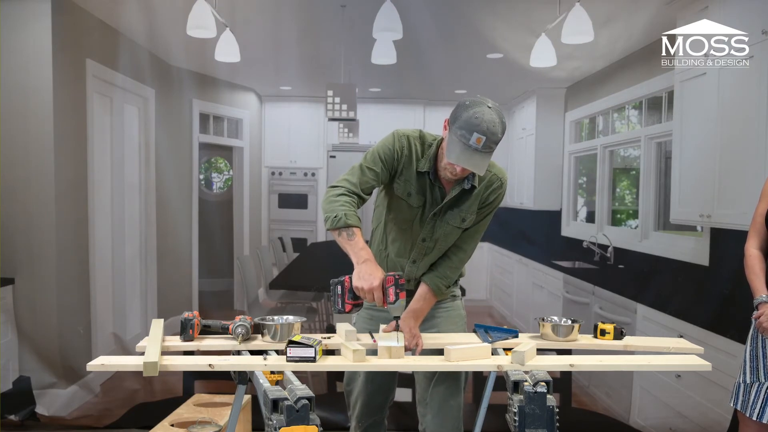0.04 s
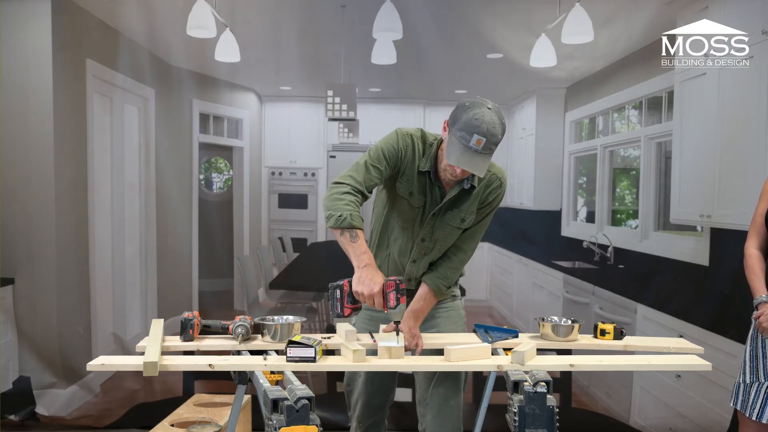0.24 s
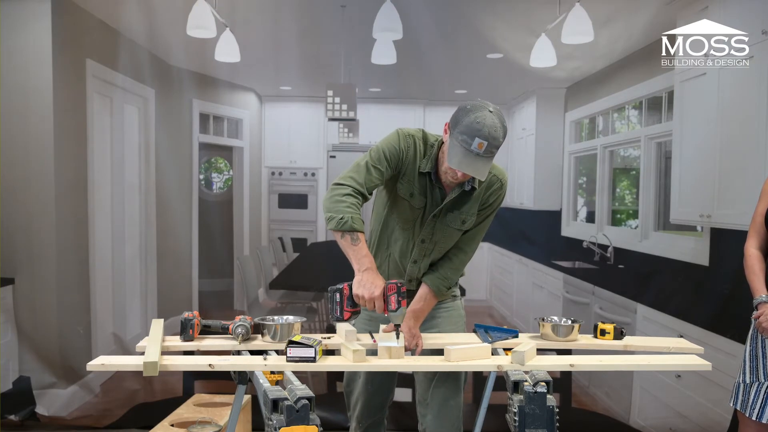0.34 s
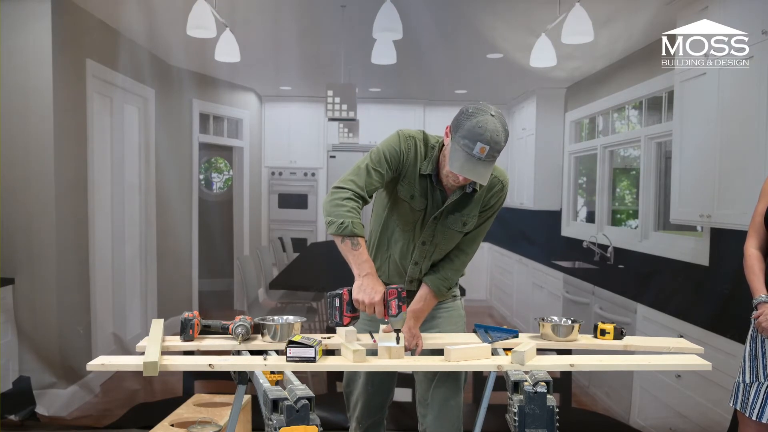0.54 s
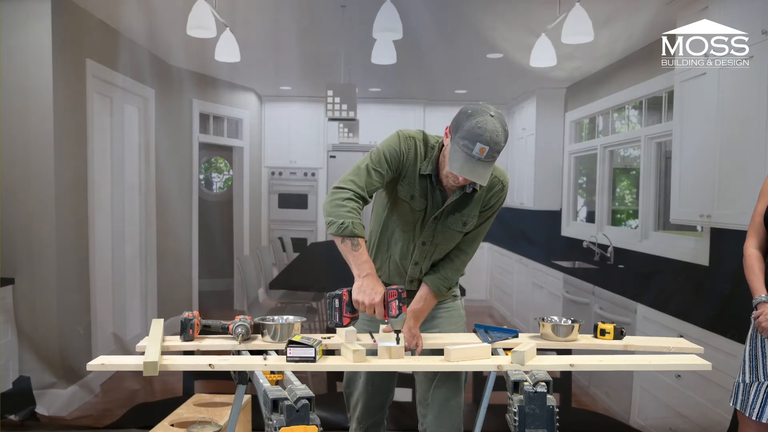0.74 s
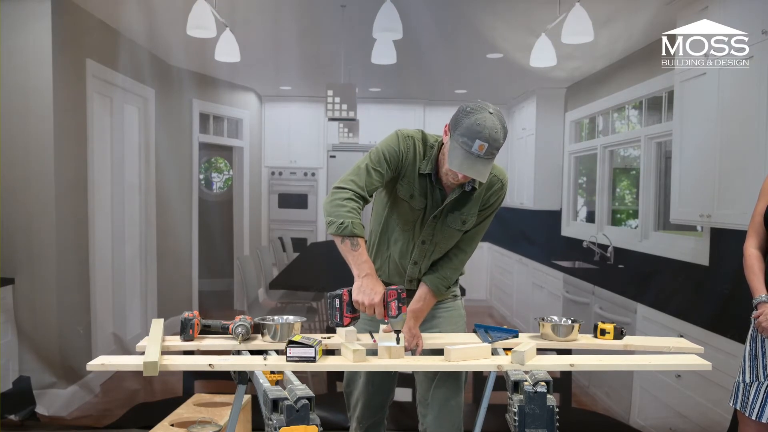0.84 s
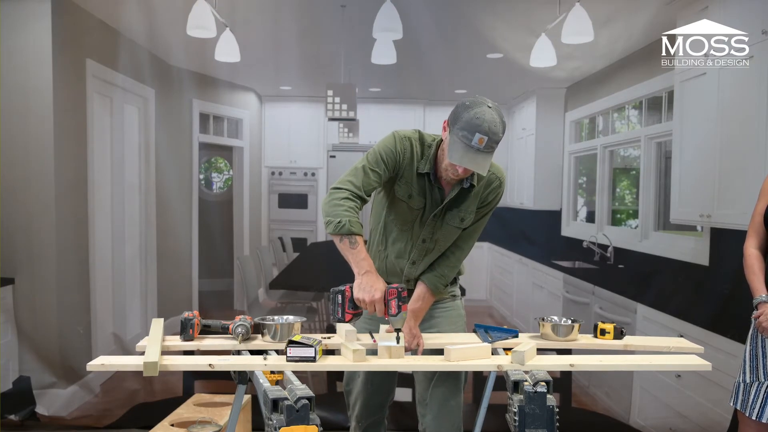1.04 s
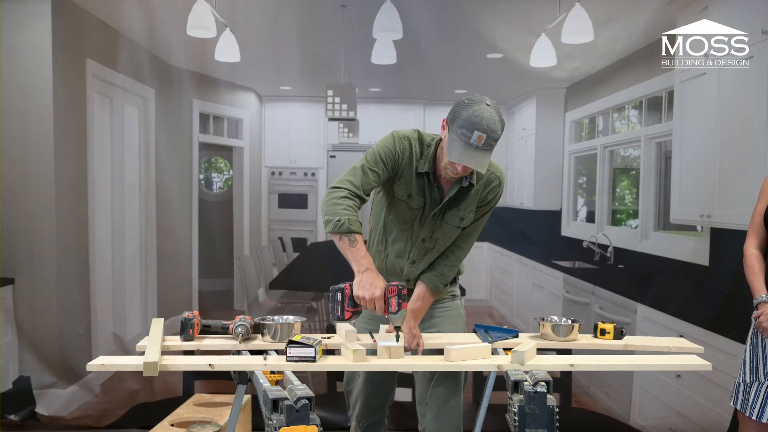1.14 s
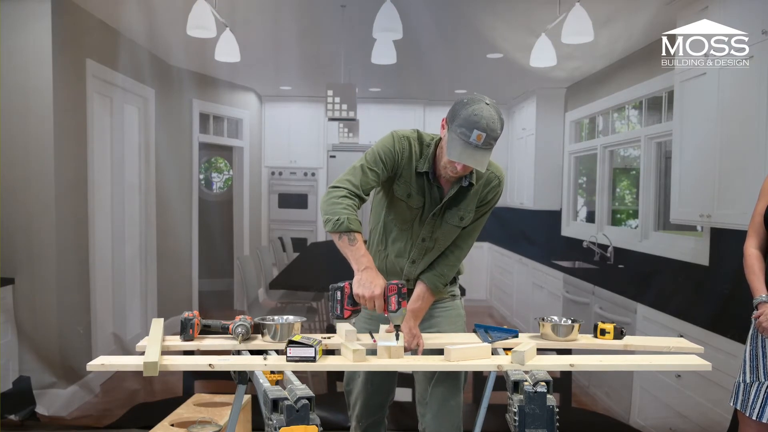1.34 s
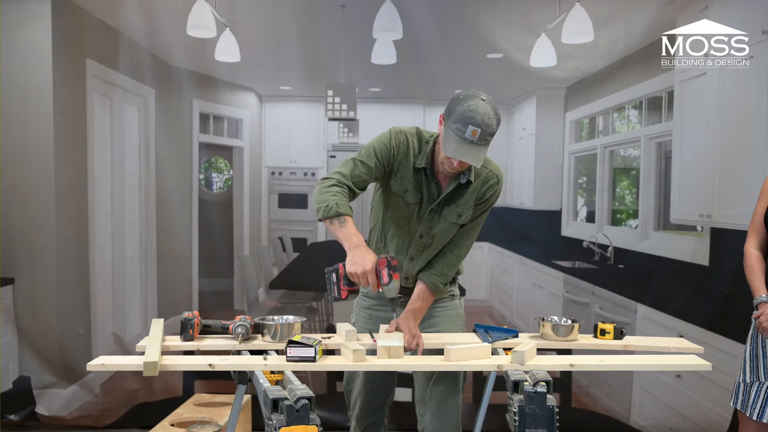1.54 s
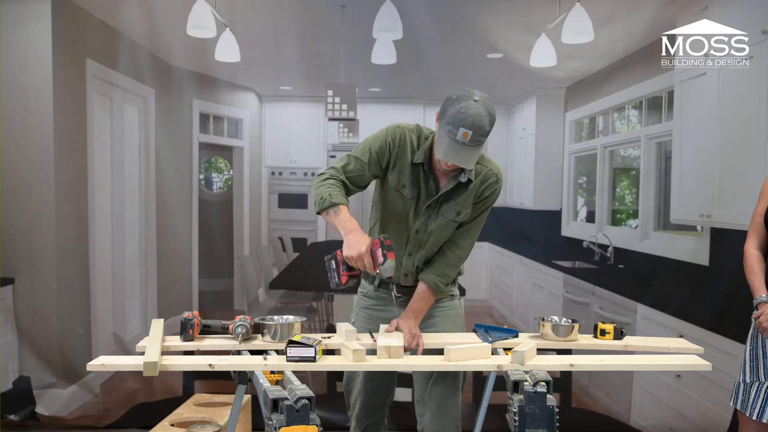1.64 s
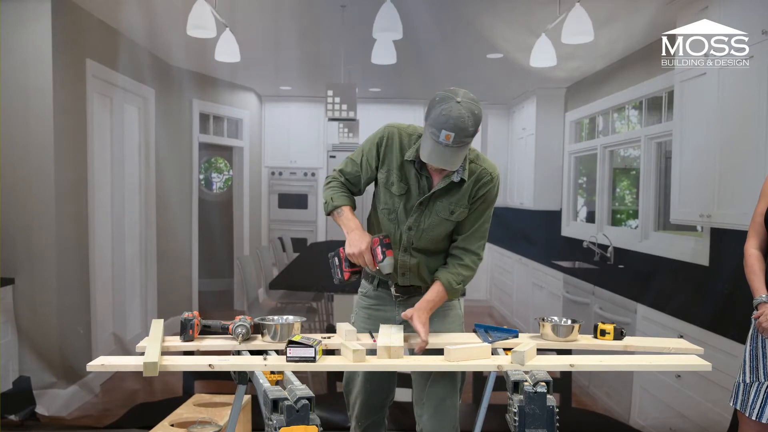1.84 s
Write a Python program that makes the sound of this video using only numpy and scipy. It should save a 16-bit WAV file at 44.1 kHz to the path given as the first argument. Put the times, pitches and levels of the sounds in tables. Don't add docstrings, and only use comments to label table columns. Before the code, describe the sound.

A cordless drill clicks on and whines up fast, sags in pitch as the bit grinds into a board, climbs again, then brakes with clicks in a hard room, heard from a couple of metres away.

```python
import sys
import numpy as np
from scipy import signal
from scipy.fft import rfft, irfft
from scipy.io import wavfile
from scipy.ndimage import uniform_filter1d

SR = 44100
rng = np.random.default_rng(int(sys.argv[2]) if len(sys.argv) > 2 else 0)


def wav_record(signal):
    frames = np.transpose(np.atleast_2d(signal))
    bounded = np.clip(frames, -1, 1)
    quanta = np.round(bounded * 32767).astype(np.int16)
    wavfile.write(sys.argv[1], SR, quanta)


def linear_from_db(decibels):
    return 10 ** (np.asarray(decibels, float) / 20)


N = 83790
TRIGGER_S, ENGAGE_S, STOP_S = .208, .24, 1.607


def level(x, db):
    return x * linear_from_db(db) / np.sqrt(np.mean(x ** 2))


def noise():
    return rng.standard_normal(N)


def colour(x, points):
    hz = np.fft.rfftfreq(N, 1 / SR) + 1
    point_hz, point_db = np.array(points).T
    gain_db = np.interp(np.log(hz), np.log(point_hz), point_db, left=-60, right=-90)
    return irfft(rfft(x) * linear_from_db(gain_db), N)


def ring(x, hz, width):
    b, a = signal.iirpeak(min(hz, .45 * SR), hz / max(width, 5), fs=SR)
    return signal.lfilter(b, a, x)


def body(x, peaks):
    return sum((-1) ** k * linear_from_db(db) * ring(x, hz, width) for k, (hz, width, db) in enumerate(peaks))


def walk(rate):
    hold = int(SR / rate)
    steps = np.repeat(rng.standard_normal(N // 20), hold)[:N]
    return 1.233 * uniform_filter1d(uniform_filter1d(steps, hold), hold)


def grit(scatter_db):
    impacts = noise()
    size_db = scatter_db * np.minimum(rng.exponential(size=N), 4)
    return impacts * linear_from_db(size_db)


def whine(hz, db):
    waver, flutter_db, flutter_hz = .0012, 2.0, 35
    phase = 2 * np.pi * np.cumsum(hz * (1 + waver * walk(59.7))) / SR
    return np.sqrt(2) * linear_from_db(db + flutter_db * walk(flutter_hz)) * np.sin(phase)


# time in seconds, first gear mesh in Hz.
SPEED = [(.208, 0), (.26, 2400), (.285, 3400), (.31, 3900), (.34, 4150), (.38, 4280), (.43, 4315),
         (.49, 4225), (.66, 3790), (.76, 3610), (.83, 3490), (.93, 3445), (1.07, 3495), (1.2, 3750),
         (1.4, 3990), (1.53, 4185), (1.555, 4180), (1.58, 3000)]


def mesh_hz(t):
    return uniform_filter1d(np.interp(t, *np.array(SPEED).T), size=600)


# time in seconds, then levels in dB of the first mesh, second mesh and loaded stage.
WHINE = [(.29, -44, -52, -45), (.33, -37, -44, -45), (.37, -41, -43, -45), (.43, -40, -38, -40),
         (.5, -36, -46, -37), (.6, -39, -47, -38), (.7, -44, -47, -36), (.78, -46, -46, -33),
         (.9, -43, -47, -30), (1.07, -43, -47, -30), (1.1, -43, -45, -37), (1.2, -40, -40, -42),
         (1.3, -38, -47, -46), (1.41, -38, -46, -48), (1.44, -36, -38, -48), (1.555, -38, -38, -48)]


def gear_gain(t, column):
    rows = np.array(WHINE)
    return linear_from_db(np.interp(t, rows[:, 0], rows[:, column]))


# multiple of the mesh, level in dB over its gear, column of that gear in WHINE.
FREE = [(1.0, 0, 1), (.972, -11, 1), (2.004, -17, 1), (.737, 0, 2), (1.472, -7, 1)]
# offset in Hz, shift in Hz per Hz of mesh, level in dB over the first mesh.
OVERTONE = (6500, 1.2, -21)


def free_gears(t, hz):
    tones = sum(whine(k * hz, db) * gear_gain(t, column) for k, db, column in FREE)
    offset_hz, shift, overtone_db = OVERTONE
    tones = tones + whine(offset_hz + shift * hz, overtone_db) * gear_gain(t, column=1)
    speed_gain = np.minimum(hz / hz.max() / .8, 1) ** 6
    ending = np.clip((1.578 - t) / .022, 0, 1)
    return tones * speed_gain * ending


# multiple of the mesh, level in dB over the loaded stage.
LOADED = [(.825, 0), (.804, -11), (1.247, -14)]
# offset in Hz, shift in Hz per Hz of mesh, dB over the loaded stage.
HIGH_TONES = [(10160, 0, -23), (11760, 0, -29), (17350, -.825, -36), (16200, -.825, -38)]
# multiple of the mesh, level in dB.
ROUGH = [(.41, -42), (.431, -43), (1.635, -47), (1.667, -49), (2.477, -52), (2.06, -58)]


def loaded_gears(t, hz):
    stage = sum(whine(k * hz, db) for k, db in LOADED)
    stage = stage + sum(whine(offset_hz + k * hz, db) for offset_hz, k, db in HIGH_TONES)
    rough = sum(whine(k * hz * (1 + .0024 * walk(90)), db) for k, db in ROUGH)
    bite_s, rise_s, bite_ends_s, fall_s = .4, .07, 1.36, .14
    bite = np.clip(np.minimum((t - bite_s) / rise_s, (bite_ends_s - t) / fall_s), 0, 1)
    return (stage * gear_gain(t, column=3) + rough) * bite


def motor_start(t):
    start_s, rise_s, pitch_hz, peak_db, t60_s = .201, .013, 7800, -52, .12
    rise = np.clip((t - start_s) / rise_s, 0, 1)
    decay = linear_from_db(peak_db - 60 * np.maximum(t - TRIGGER_S, 0) / t60_s)
    return rise * decay * np.sin(2 * np.pi * pitch_hz * t)


# time in seconds, then levels in dB of the housing rattle, bit scraping and board drone.
DRILL = [(.28, -0.5, -5.5, -3.5), (.34, 3, -0.5, -16), (.42, 1.5, 0, -2), (.5, 1.5, 1.5, 2),
         (.58, 2, 5.5, 4), (.68, 2, 4.5, -3.5), (.77, 4, 7.5, -15), (.87, 3, 0.5, -7), (.96, 3.5, 5, 2.5),
         (1.09, 2.5, 6, 2), (1.17, 2, 5.5, -4.5), (1.193, -3.5, 6, 8.5), (1.28, 2, 0, 7.5),
         (1.38, 1, 1.5, 5.5), (1.43, 2.5, -7, -10), (1.555, -2.5, -2.5, -21)]


def control(t, column):
    rows = np.array(DRILL)
    db = rows[:, column]
    spin_up_db = -15.5
    times = np.r_[TRIGGER_S, ENGAGE_S, rows[:, 0]]
    levels_db = np.r_[db[0] + spin_up_db, db[0], db]
    running = uniform_filter1d(1. * ((t > TRIGGER_S) & (t < STOP_S)), size=90)
    return linear_from_db(np.interp(t, times, levels_db)) * running


# frequency in Hz, spectral level in dB per Hz.
RATTLE = [(180, 8), (300, -22), (641, 1), (2740, 2.5), (4080, -3), (5220, -12), (6060, -9), (11700, -15),
          (15500, -38)]
# resonance in Hz, width in Hz, level in dB.
HOUSING = [(4300, 1350, 0), (5900, 1000, 9), (8870, 1500, -5.5), (12300, 1500, -15)]


def rattle(t):
    impacts = colour(grit(scatter_db=3.0), RATTLE)
    shell = level(impacts + body(impacts, HOUSING), -36.5)
    return shell * linear_from_db(1.7 * walk(110)) * control(t, column=1)


# resonance in Hz, width in Hz, level in dB.
SCRAPE = [(1175, 230, -0.5), (1552, 117, 3.5), (1940, 606, -3), (2330, 400, -4), (3000, 600, -10)]


def scrape(t):
    tearing = level(body(grit(scatter_db=3), SCRAPE), -39.5)
    return tearing * linear_from_db(.75 * walk(51.4)) * control(t, column=2)


# resonance in Hz, width in Hz, level in dB.
BOARD = [(440, 87, -5.5), (559, 78, 0), (729, 163, 2), (877, 88, -3)]


def board(t):
    radiates = signal.butter(4, 360, "high", fs=SR, output="sos")
    drone = level(signal.sosfilt(radiates, body(grit(scatter_db=3), BOARD)), -44)
    return drone * linear_from_db(2.0 * walk(30)) * control(t, column=3)


# start in seconds, peak in dB, ring in Hz, t60 in seconds.
CLICKS = [(0.152, -72, 2840, 0.09), (.211, -36, 3440, 0.016), (0.2538, -23, 3950, .012),
          (0.2593, -21, 4200, .012), (.262, -25, 4400, 0.013), (0.2644, -26, 3000, 0.0084),
          (0.2877, -24, 3210, 0.018), (1.5675, -26, 3470, 0.016), (1.571, -35, 3270, 0.019),
          (1.578, -34, 2480, 0.016), (1.5985, -28, 3230, .012), (1.6032, -27, 4300, 0.017),
          (1.604, -30, 1670, 0.018)]


def clicks(t):
    gain_db, crack_db, crack_t60_s, knock_hz, knock_db = .5, -7.5, .004, 1320, -12.5
    crack_noise = level(ring(ring(noise(), 5500, 4100), 5500, 4100), 0)
    out = np.zeros(N)
    for s, db, hz, t60 in CLICKS:
        since = np.maximum(t - s, 0)
        tone = np.sin(2 * np.pi * hz * since)
        tone = tone + linear_from_db(knock_db) * np.sin(2 * np.pi * knock_hz * since)
        tone = tone * linear_from_db(-60 * since / max(t60, .003))
        crack = linear_from_db(crack_db - 60 * since / crack_t60_s) * crack_noise
        out += (t >= s) * linear_from_db(db + gain_db) * (tone + crack)
    return out


# start in seconds, peak in dB, ring in Hz, t60 in seconds.
JOLTS = [
    (.228, -32, 793, .08),
    (0.229, -34, 440, 0.076),
    (0.249, -25, 1185, 0.064),
    (1.603, -38.5, 708, 0.076),
]


def jolts(t):
    out = np.zeros(N)
    for s, db, hz, t60 in JOLTS:
        since = np.maximum(t - s, 0)
        rise = 1 - np.exp(-since / .0022)
        out += linear_from_db(db - 60 * since / t60) * rise * np.sin(2 * np.pi * hz * since)
    return out


# frequency in Hz, reverberation time in seconds.
ROOM_T60 = [(300, 0.42), (800, 0.22), (1700, 0.34), (2500, 0.28), (3100, 0.45), (4300, 0.74), (6000, 0.41),
            (9000, 0.35), (14000, 0.4)]


def room(x, t):
    row_hz, row_t60 = np.array(ROOM_T60).T
    tail = 0
    for hz in 250 * 2 ** np.arange(0, 6.1, .5):
        t60 = np.interp(np.log(hz), np.log(row_hz), row_t60)
        tail = tail + ring(noise(), hz, hz / 3) * linear_from_db(-60 * t / t60)
    tail = tail * (t > .004)
    tail = tail * linear_from_db(-6) / np.sqrt(np.sum(tail ** 2))
    return signal.fftconvolve(x, tail)[:N]


# frequency in Hz, spectral level in dB per Hz.
FLOOR = [(20, -14), (60, -5), (100, 1.5), (200, -6), (400, -25.5), (4200, -48), (6500, -72), (9000, -95)]
# centre in Hz, width in Hz, level in dB.
HUM = [(97, 14, -57), (152, 14, -60), (5600, 30, -94), (6050, 30, -96)]


def floor():
    hum = sum(level(ring(noise(), hz, width), db) for hz, width, db in HUM)
    return level(colour(noise(), FLOOR), -57.5) + hum


def scene():
    t = np.arange(N) / SR
    hz = mesh_hz(t)
    tones = free_gears(t, hz) + loaded_gears(t, hz) + motor_start(t)
    noises = rattle(t) + scrape(t) + board(t) + clicks(t) + jolts(t)
    echoes = room(linear_from_db(-1) * tones + noises, t)
    return (tones + noises + echoes + floor())[None]


def band_limit(x):
    return signal.sosfilt(signal.butter(12, 15690, fs=SR, output="sos"), x)


def record(dry):
    return band_limit(dry)


dry = scene()
out = record(dry)
wav_record(out)
```